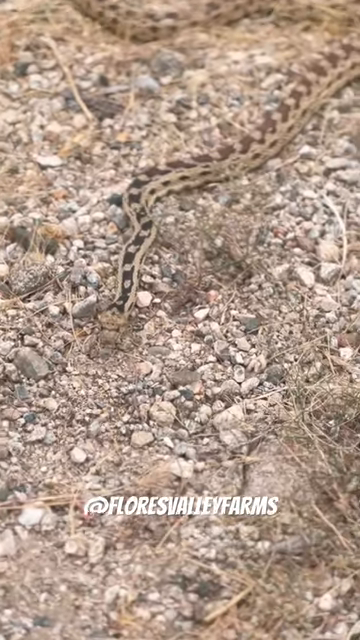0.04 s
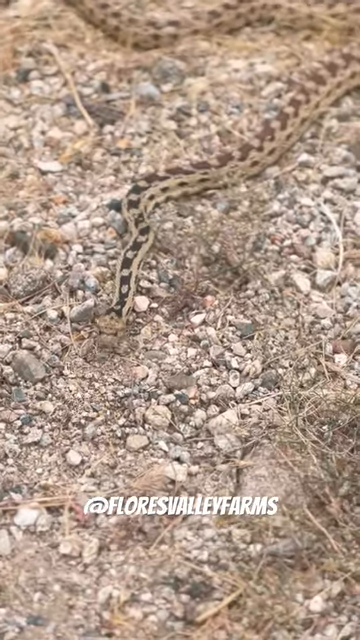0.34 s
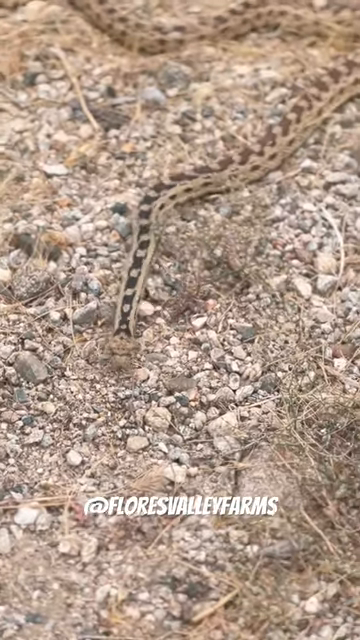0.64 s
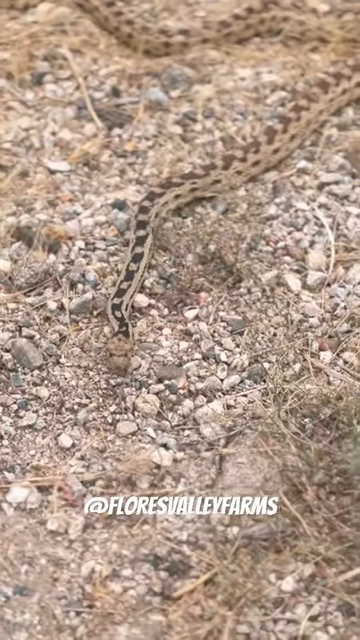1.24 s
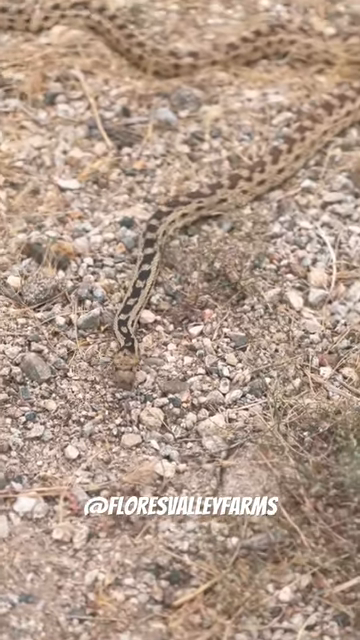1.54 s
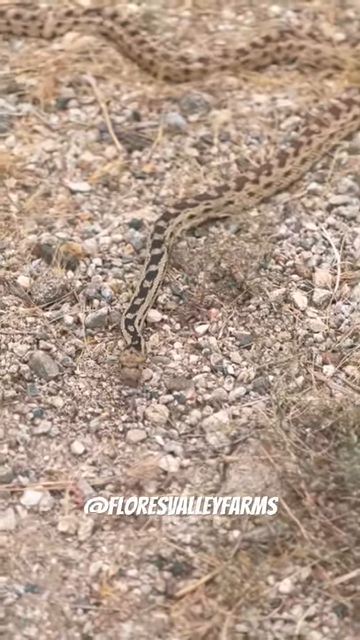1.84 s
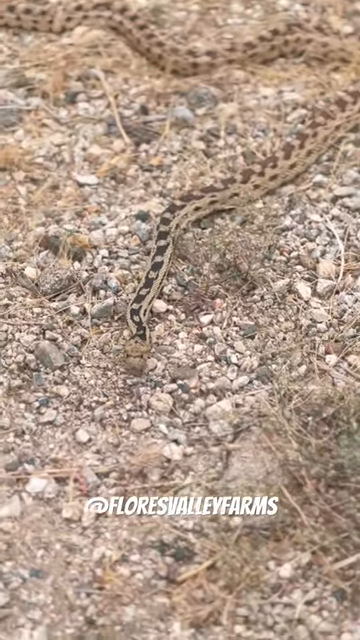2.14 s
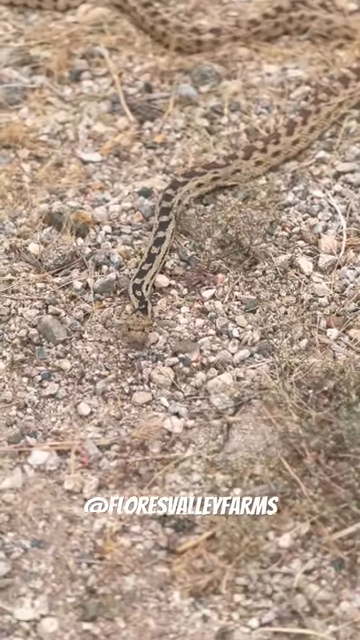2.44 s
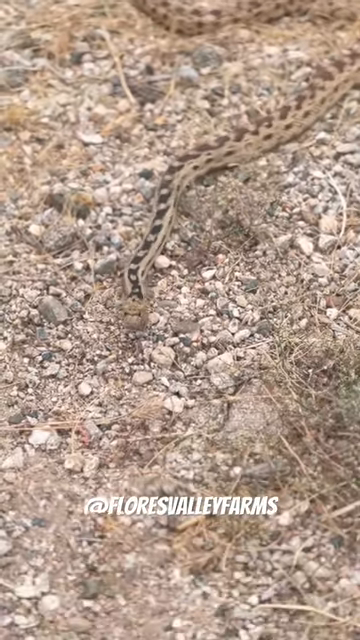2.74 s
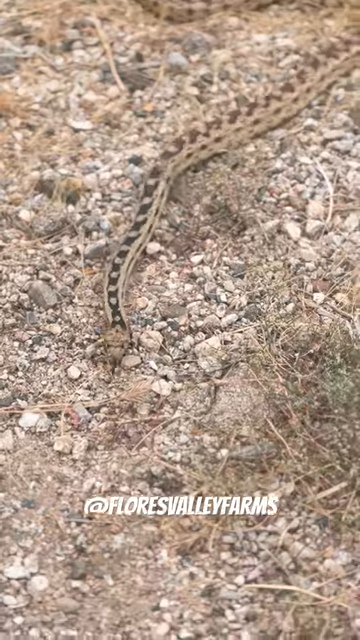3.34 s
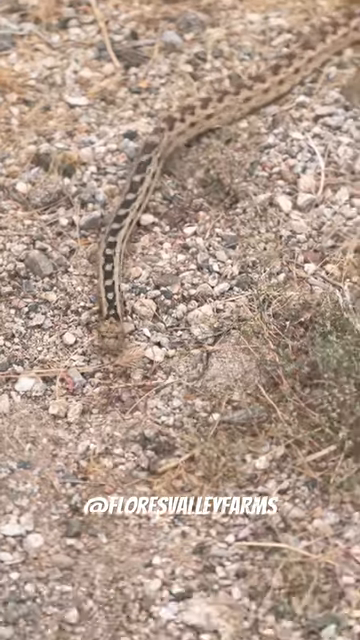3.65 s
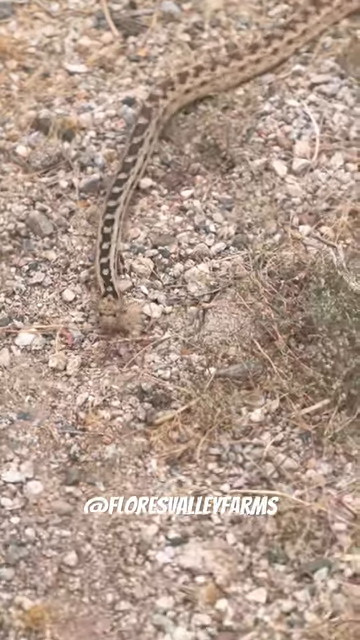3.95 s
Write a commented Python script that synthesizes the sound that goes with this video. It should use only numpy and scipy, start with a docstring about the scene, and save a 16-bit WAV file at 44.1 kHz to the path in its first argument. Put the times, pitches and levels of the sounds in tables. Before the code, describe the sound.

Wind rumbles and flutters on the microphone throughout, thumping and popping harder from about 1.7 seconds. A small animal gives four sharp, high, falling chirps at 0.1, 1.0, 1.8 and 2.7 seconds. A snake slides over gravel with a soft hiss from 1 to 2 seconds and again after 3.2. Dry grass rustles faintly, pebbles tick, and a distant bird is barely heard around 1.2 and 1.6 seconds.

```python
"""Snake on desert gravel

A snake slides over dry gravel, its scales hissing softly and nudging pebbles. A small animal,
probably a ground squirrel, whistles four sharp falling alarm chirps that echo off stones and scrub.
Gusts rumble, flutter, thump and pop on the microphone. Dry grass rustles as its stems brush
together, and something, perhaps a bird, calls faintly far away."""
import sys
import numpy as np
from scipy import signal
from scipy.fft import rfft, irfft
from scipy.io import wavfile
from scipy.ndimage import uniform_filter1d

SR = 44100
rng = np.random.default_rng(int(sys.argv[2]) if len(sys.argv) > 2 else 0)


def put_to_file(sound):
    """Save the sound as 16-bit audio at rate SR, in the file named by the first command-line argument."""
    columns = np.atleast_2d(sound).T  # one column per channel
    safe = np.clip(columns, -1, 1)
    whole_steps = np.round(safe * 32767)
    wavfile.write(sys.argv[1], SR, whole_steps.astype(np.int16))


N = 176400
T = np.arange(N) / SR

# "Mid" is what both ears share and "side" is how they differ: more side sounds wider.
# Width of the wind: f/Hz, side level/dB
WIND_WIDTH = [(60, -29.5), (125, -33), (250, -14), (450, -7.5), (800, -5), (1500, -1), (3000, -24)]
# Width of sounds on the ground: f/Hz, side level/dB
GROUND_WIDTH = [(1000, 6), (5500, -6.5), (9000, -7), (13000, -7)]


def from_db(db):
    """Turn decibels into a factor to multiply by."""
    return 10 ** (np.asarray(db) / 20)


def rms_one(x):
    """Scale a signal so that its average strength (rms) is 1."""
    return x / np.sqrt(np.mean(x ** 2) + 1e-20)


def in_time(rows):
    """Join (time, value) points with straight lines, giving a value for every sample."""
    return np.interp(T, *np.transpose(rows))


def at_hz(rows, hz, column=1):
    """Read a table between its frequencies, with octaves evenly spaced."""
    rows = np.array(rows)
    return np.interp(np.log(np.maximum(hz, 1)), np.log(rows[:, 0]), rows[:, column])


def butter(x, hz, kind, order=2):
    """Keep the lows, the highs or a band; a higher order cuts more sharply."""
    sections = signal.butter(order, np.clip(hz, 10, .48 * SR), kind, fs=SR, output="sos")
    return signal.sosfilt(sections, x + 1e-18)


def drift(rate_hz):
    """A smooth random wobble of typical size 1."""
    pole = np.exp(-40 * np.pi * rate_hz / SR)
    noise = rng.standard_normal(N // 20 + 4002)
    slow = signal.lfilter([1], [1, -2 * pole, pole * pole], noise)[4000:]
    return np.interp(np.arange(N) / 20, np.arange(len(slow)), rms_one(slow))


def stereo(mid, side):
    """Make left and right from mid and side."""
    return np.array([mid + side, mid - side])


def coloured(pair, colour, width):
    """Give two noises a tone colour and a stereo width; the mid has strength 1."""
    hz = np.arange(N // 2 + 1) * SR / N
    spectra = rfft(pair) * from_db(at_hz(colour, hz))
    mid = irfft(spectra[0], N)
    side = irfft(spectra[1] * from_db(at_hz(width, hz)), N)
    return stereo(mid, side) / np.std(mid)


def grains(per_s, spread_db):
    """Tiny random impacts of uneven size, as mid and side."""
    sizes = from_db(spread_db * np.minimum(rng.exponential(1, N), 4))
    hits = rng.random(N) < per_s / SR
    return rms_one(sizes * hits * rng.standard_normal((2, N)))


def evened(pair, span_s):
    """Hold the level of a noise steady over the given span."""
    power = uniform_filter1d(np.mean(pair ** 2, axis=0), max(int(span_s * SR), 2))
    return pair / np.sqrt(power + 1e-9)


def with_energy_of(shape, pair):
    """Scale each of two bursts to hold as much energy as the shape."""
    return pair * np.sqrt(np.sum(shape ** 2) / np.sum(pair ** 2, axis=1, keepdims=True))


def swell(start, length):
    """A smooth rise and fall."""
    return np.sin(np.pi * np.clip((T - start) / length, 0, 1))


def air(level_db=-63):
    """The quiet, steady hush of open air."""
    # Tone of the hush: f/Hz, level/dB
    colour = [(100, -15.5), (220, 13.5), (700, -19.5), (1100, -12.5), (1600, -10.5), (2500, -18.5),
              (4200, -31), (9000, -33.5), (16000, -48.5)]
    # Its width: f/Hz, side level/dB
    width = [(150, 12), (1500, 11), (3000, -1), (6000, -2.5)]
    return from_db(level_db) * coloured(rng.standard_normal((2, N)), colour, width)


def far_bird(blur_hz=190):
    """Faint gliding notes, blurred by distance."""
    # Bird notes: t/s, length/s, first f/Hz, last f/Hz, level/dB
    notes = [(1.138, 0.078, 1800, 1605, -60), (1.201, 0.059, 1584, 1460, -53.5),
             (1.529, 0.138, 1533, 1735, -56)]
    out = np.zeros(N)
    for start, length, first_hz, last_hz, db in notes:
        hz = np.interp(T, [start, start + length], [first_hz, last_hz])
        tone = np.sin(2 * np.pi * np.cumsum(hz) / SR)
        out += from_db(db) * swell(start, length) * drift(blur_hz) * tone
    return out


def grass(flicker_db=2):
    """Dry stems brush together in short crackly swells."""
    # Rustles: t/s, length/s, level/dB
    rustles = [(0.286, 0.24, -63.5), (0.493, 0.24, -68.5), (1.013, 0.13, -59), (1.609, 0.23, -56.5),
               (2.085, 0.28, -59.5), (2.272, 0.18, -56.5), (2.381, 0.35, -65.5), (2.67, 0.26, -66)]
    # Tone of the stems: f/Hz, level/dB
    colour = [(800, 3.5), (1850, 2), (3200, -1), (4400, -9), (5500, -14), (8000, -19), (16000, -35.5)]
    level = sum(from_db(db) * swell(start, length) for start, length, db in rustles)
    flicker = from_db(flicker_db * drift(49))
    return level * flicker * coloured(grains(12000, spread_db=7), colour, GROUND_WIDTH)


def wind_rumble(trim_db=-0.08):
    """Wind on the microphone makes a deep rumble that swells and sinks."""
    # Strength of the rumble: t/s, level/dB
    levels = [(0, -48), (.15, -34.5), (.3, -37.5), (.45, -40), (.6, -38.5), (.8, -39), (.97, -32),
              (1.03, -46), (1.15, -37.5), (1.63, -38.5), (1.73, -22.5), (1.79, -38.5), (1.92, -32.5),
              (2.05, -31), (2.12, -23), (2.22, -26.5), (2.3, -43), (2.36, -31), (2.61, -27), (2.68, -41),
              (2.82, -23.5), (2.93, -30), (2.99, -37), (3.2, -27.5), (3.38, -26), (3.45, -33),
              (3.55, -28.5), (3.82, -30), (3.9, -41.5), (3.95, -24), (4, -46)]
    # Its tone: f/Hz, level/dB
    colour = [(15, -47.5), (30, -17), (45, -5.5), (62, -1.5), (90, -3.5), (130, -8.5), (200, -20),
              (400, -46.5), (1000, -107.5)]
    noise = coloured(rng.standard_normal((2, N)), colour, WIND_WIDTH)
    return from_db(in_time(levels) + trim_db) * evened(noise, span_s=0.067)


def wind_flutter(reference_db=-36.5, eddy_hz=71):
    """Wind noise brightens with each gust and flickers with its eddies (small swirls of air)."""
    # Gust strength: t/s, level/dB
    gusts = [(0, -51), (.07, -43), (.1, -48), (.16, -36), (.24, -41.5), (.33, -54), (.41, -33.5),
             (.47, -50), (.63, -52.5), (.74, -42), (.83, -54), (.87, -47.5), (.97, -40), (1.04, -46),
             (1.15, -46.5), (1.32, -53.5), (1.46, -43), (1.53, -44), (1.65, -39), (1.71, -32.5),
             (1.78, -41), (1.85, -33.5), (2.02, -40), (2.07, -39.5), (2.11, -26.5), (2.16, -34.5),
             (2.25, -30), (2.3, -46.5), (2.33, -28.5), (2.43, -43.5), (2.46, -33), (2.6, -32.5),
             (2.68, -46), (2.73, -35.5), (2.86, -40.5), (2.99, -46.5), (3.07, -34), (3.13, -39.5),
             (3.18, -25), (3.27, -32), (3.33, -36), (3.52, -39), (3.68, -39.5), (3.76, -45), (3.89, -50.5),
             (3.93, -34.5), (4, -48.5)]
    # Flutter bands: f/Hz, level at the reference gust/dB, growth/(dB per dB of gust), flicker/dB
    bands = [(135, -40.5, 0.71, 6), (238, -41, 1, 5), (398, -45.5, 1.24, 6.5), (640, -55.5, 1.38, 12.5),
             (1100, -65.5, 2.4, 5.5), (1570, -80, 2.5, 8), (2800, -92, 0.8, 0)]
    gust_db = in_time(gusts) - reference_db
    eddies = 1.44 * np.tanh(drift(eddy_hz) / 2)
    edges_hz = 125 * 2 ** np.arange(0, 5.1, .5)  # half an octave apart
    out = np.zeros((2, N))
    for low, high in zip(edges_hz, edges_hz[1:]):
        hz = np.sqrt(low * high)
        mid, side = butter(rng.standard_normal((2, N)), [low, high], "band", order=3)
        band = evened(stereo(mid, side * from_db(at_hz(WIND_WIDTH, hz))), span_s=0.038)
        db, growth, flicker_db = (at_hz(bands, hz, column) for column in (1, 2, 3))
        out += band * from_db(db + growth * gust_db + flicker_db * eddies)
    return out


def wind_thumps(width_cycles=0.45):
    """A slow eddy pushes and pulls once or twice on the microphone."""
    # Slow eddies: t/s, level/dB, f/Hz
    thumps = [(0.204, -18, 150), (.43, -21, 67.7), (0.731, -20, 82.5), (0.982, -27.5, 129),
              (1.341, -26.5, 92), (1.477, -24.5, 74), (1.905, -18, 75), (2.12, -13.5, 128),
              (3.223, -27, 190), (3.578, -18, 68), (3.714, -17, 67)]
    out = np.zeros(N)
    for centre, db, hz in thumps:
        cycles = (centre - T) * hz
        out += from_db(db) * np.sin(2 * np.pi * cycles) * np.exp(-(cycles / width_cycles) ** 2 / 2)
    return out


def wind_slaps(attack_s=0.001362, trim_db=-0.5, edge_db=-37.5, side_db=-8):
    """An eddy slaps the microphone with a sudden puff; the faster it is, the brighter it sounds."""
    # Puffs: t/s, level/dB, fade time/s, treble cutoff/Hz
    puffs = [(0.199, -30, 0.019, 550), (0.418, -28.5, 0.0057, 820), (.86, -40, 0.0073, 480),
             (1, -43.5, 0.0064, 1550), (1.101, -38.5, 0.011, 720), (1.186, -38.5, 0.0027, 785),
             (1.453, -32, 0.0095, 656), (1.59, -32.5, 0.0042, 876), (1.681, -31, 0.0075, 870),
             (1.733, -36, 0.0044, 820), (1.834, -24.5, 0.0088, 570), (1.884, -29.5, 0.0075, 750),
             (1.941, -21, 0.011, 467), (2.082, -26.5, 0.01, 790), (2.103, -23, 0.0091, 690),
             (2.12, -23.5, 0.019, 564), (2.172, -34, 0.0059, 596), (2.208, -23.5, 0.0062, 700),
             (2.252, -28.5, 0.0066, 1100), (2.326, -18.5, 0.0048, 420), (2.446, -31, 0.0046, 870),
             (2.467, -36, 0.0077, 990), (2.483, -27.5, 0.0073, 1130), (2.615, -30, 0.0098, 1010),
             (2.726, -28, 0.012, 583), (2.772, -34.5, 0.0087, 845), (3.156, -20.5, 0.0048, 650),
             (3.184, -17.5, 0.018, 378), (3.248, -26, 0.0077, 597), (3.262, -28, 0.0034, 640),
             (3.275, -16, 0.0093, 380), (3.339, -26, 0.0072, 567), (3.442, -28, 0.0081, 760),
             (3.803, -28, 0.0043, 603), (3.921, -32, 0.015, 640)]
    out, t = np.zeros((2, N)), T[:SR // 8]
    for peak_s, db, decay_s, cutoff_hz in puffs:
        shape = np.minimum(t / attack_s, 1) * np.exp(-np.maximum(t - attack_s, 0) / decay_s)
        noise = evened(rng.standard_normal((2, len(t))), span_s=0.00043) * shape
        body = butter(noise, cutoff_hz, "low", order=4)
        edge = from_db(edge_db) * butter(noise, 2 * cutoff_hz, "low", order=4)
        mid, side = with_energy_of(shape, butter(body + edge, 150, "high"))
        i = int((peak_s - attack_s) * SR)
        out[:, i:i + len(t)] += from_db(db + trim_db) * stereo(mid, side * from_db(side_db))[:, :N - i]
    return out


def wind_pops(trim_db=-1, wake_db=-3, wake_s=0.0045, side_db=-8, low_hz=232, high_hz=3270):
    """A tight swirl crosses the microphone: a pressure spike, then a ragged wake. Narrow is bright."""
    # Pops: t/s, level/dB, width/s
    pops = [(.4258, -20, 0.00026), (0.5406, -22, 0.00087), (.656, -27, 0.00047), (0.98, -16.5, .0011),
            (1.4701, -13.5, .0008), (1.6893, -17, 0.00073), (1.6919, -14.5, 0.00044),
            (1.8946, -18, 0.00081), (1.991, -28, 0.0006), (2.045, -17.5, .0008), (2.1066, -31, 0.00039),
            (2.1207, -15.5, 0.00057), (2.187, -10.5, 0.00074), (2.2074, -16, 0.0006),
            (2.2263, -13, 0.00073), (2.245, -9.5, 0.00048), (2.328, -31, 0.00014), (2.3611, -20.5, 0.00049),
            (2.376, -15, 0.00059), (2.3794, -13, 0.00054), (2.401, -23.5, 0.00059), (2.5031, -19, 0.00056),
            (2.5504, -32, 0.00035), (2.6041, -12, 0.00046), (2.7783, -19.5, 0.00055),
            (2.8613, -10, 0.00048), (2.8698, -16, 0.00043), (3.1603, -24, 0.00056), (3.1786, -22, .0008),
            (3.1996, -10.5, 0.00072), (3.2072, -11.5, 0.00057), (3.219, -15, 0.00084),
            (3.2988, -18.5, 0.00066), (3.4049, -18, 0.00054), (3.4893, -14.5, 0.00097),
            (3.71, -21, 0.00084)]
    out, size = np.zeros((2, N)), SR // 20
    t = (np.arange(size) - size // 10) / SR
    hz = np.arange(size // 2 + 1) * SR / size
    soft_ends = signal.get_window(("tukey", .15), size)
    mid_and_side = np.array([[1], [1j * from_db(side_db)]])  # a quarter cycle apart
    for peak_s, db, width_s in pops:
        wake = rng.standard_normal((2, size)) * (t > 0) * np.exp(-np.abs(t) / wake_s)
        wake *= from_db(wake_db) / np.sqrt(np.sum(wake[0] ** 2))
        random_phase = np.exp(2j * np.pi * rng.random())
        spike = rfft(1. * (t == 0)) * mid_and_side * random_phase
        blur = np.exp(-np.pi * width_s * hz)
        pulse = irfft((spike + rfft(wake)) * blur, size) / irfft(blur, size)[0] * soft_ends
        mid, side = butter(butter(pulse, low_hz, "high"), high_hz, "low", order=3)
        i = int((peak_s + t[0]) * SR)
        out[:, i:i + size] += from_db(db + trim_db) * stereo(mid, side)[:, :N - i]
    return out


def pebbles(sharpness=0.77):
    """A pebble or twig gives way with a tiny crunch in one broad band of pitch."""
    # Crunches: t/s, level/dB, f/Hz, fade time/s
    ticks = [(0.323, -56, 4260, 0.0071), (0.7338, -56, 11000, 0.0051), (0.998, -51, 3700, 0.0021),
             (1.0924, -51, 12000, .005), (1.314, -60, 10000, .003), (1.66, -41, 2820, 0.0013),
             (1.8939, -41.5, 9150, 0.0014), (1.909, -44, 11000, 0.0025), (1.914, -50, 5700, 0.0035),
             (2.349, -47, 2800, 0.0015), (3.5354, -47, 10400, 0.0084), (3.979, -35, 3000, 0.0022)]
    out, t = np.zeros((2, N)), T[:SR // 10]
    edge_ratio = 1 + .5 / sharpness
    for start, db, hz, decay_s in ticks:
        shape = np.exp(-t / decay_s)
        burst = rng.standard_normal((2, len(t))) * shape
        crunch = butter(burst, [hz / edge_ratio, hz * edge_ratio], "band", order=3)
        mid, side = with_energy_of(shape, crunch)
        side *= from_db(at_hz(GROUND_WIDTH, hz))
        i = int(start * SR)
        out[:, i:i + len(t)] += from_db(db) * stereo(mid, side)[:, :N - i]
    return out


def echo_spray(db, fade_s, first_s=0.0042):
    """A dense spray of tiny echoes that falls by 60 dB in fade_s."""
    t = T[:SR // 2]
    spray = grains(4000, spread_db=3)[:, :len(t)] * from_db(-60 * t / fade_s) * (t > first_s)
    return from_db(db) * spray / np.sqrt(np.sum(spray[0] ** 2))


def scrub_echoes(call, treble_db=8.5, side_db=-7):
    """Stones close by add quick, bright echoes to a call; bushes farther off add a faint, dull tail."""
    stones = echo_spray(db=-7, fade_s=0.11)
    stones += from_db(treble_db) * butter(stones, 8700, "high", order=8)
    bushes = butter(echo_spray(db=-10, fade_s=0.39), 5170, "low", order=5)
    mid, side = (signal.fftconvolve(call, echoes)[:N] for echoes in stones + bushes)
    return stereo(call + mid, from_db(side_db) * side)


def alarm_chirps():
    """Each chirp is a whistle that plunges and levels off, its overtones gaining on it as it fades."""
    # Chirps: t/s, level/dB, final f/Hz, length/s, overtone level against the whistle/dB
    chirps = [(0.1206, -29, 5096, 0.037, -26.5), (1.0254, -31, 5120, 0.044, -23),
              (1.767, -33, 5120, 0.053, -25.5), (2.6999, -33.5, 5030, 0.046, -26.5)]
    swoop_hz, swoop_s = 2130, .0125  # the pitch sinks towards its final value
    snap_hz, snap_s = 1310, 0.0043  # with a steeper drop at the very start
    attack_s, hold_s, release_s = 0.011, 0.0045, 0.0055
    fade_db_per_s, overtone_db_per_s, third_db = 375, 222, -9
    out = np.zeros(N)
    for start, db, end_hz, length, overtone_db in chirps:
        t = np.clip(T - start, 0, 2 * length)
        hz = end_hz + swoop_hz * np.exp(-t / swoop_s) + snap_hz * np.exp(-t / snap_s)
        phase = 2 * np.pi * np.cumsum(hz * (1 + 0.0026 * drift(210))) / SR
        opening = np.sin(np.pi / 2 * np.minimum(t / attack_s, 1)) ** 2
        closing = np.clip((length - t) / release_s + .5, 0, 1)
        level = from_db(db - fade_db_per_s * np.maximum(t - hold_s, 0))
        overtones = np.sin(2 * phase) + from_db(third_db) * np.sin(3 * phase)
        overtones *= from_db(overtone_db + overtone_db_per_s * (t - hold_s))
        out += opening * closing * level * (np.sin(phase) + overtones)
    return out


def snake(trim_db=-5.5, grain_db=0.5, flicker_db=1.68, patchy_db=1.74, band_hz=1200):
    """Belly scales drag over sand: countless grains slip in a hiss whose tone shifts with the ground."""
    # Strength of the sliding: t/s, level/dB
    levels = [(0, -80), (.72, -82), (.75, -69), (.82, -66), (1.0, -63), (1.1, -57.5), (1.22, -51),
              (1.38, -61.5), (1.55, -54.5), (1.67, -50.5), (1.85, -55.5), (2.1, -55), (2.24, -85.5),
              (2.41, -60.5), (2.58, -77), (3.14, -79), (3.21, -61), (3.33, -52.5), (3.55, -47), (3.82, -54),
              (4, -47.5)]
    # Tone of the hiss: f/Hz, level/dB
    colour = [(1000, -6), (2000, -6), (3500, -5), (5000, -5.5), (6400, -4.5), (7300, -5.5), (8400, 2),
              (9600, 0), (11500, -9.5), (14500, -5.5), (16000, -3)]
    friction = rng.standard_normal((2, N)) + from_db(grain_db) * grains(2300, spread_db=-2)
    spectrum = rfft(coloured(friction, colour, GROUND_WIDTH))
    band = np.arange(spectrum.shape[1]) * SR // N // band_hz  # each band wavers on its own
    hiss = sum(irfft(spectrum * (band == k), N) * from_db(patchy_db * drift(8)) for k in range(14))
    return from_db(in_time(levels) + trim_db + flicker_db * drift(35)) * hiss


def scene():
    """Animals, ground and wind over quiet open air."""
    hush = air()
    calls = scrub_echoes(alarm_chirps()) + far_bird()
    ground = snake() + grass() + pebbles()
    wind = wind_rumble() + wind_flutter() + wind_thumps() + wind_slaps() + wind_pops()
    return hush + calls + ground + wind


def record(dry, low_cut_hz=37, high_cut_hz=15950, spread_db=-1.5, spread_above_hz=4000):
    """The recorder narrows the bass and upper mids, widens the treble, and cuts the extremes of pitch."""
    # The recorder's stereo width: f/Hz, side level/dB
    width = [(1500, -7.5), (1900, -24.5), (2600, -34), (4600, -40.5), (5100, -4.5), (16000, 2)]
    # The bass goes mono (alike in both ears) as the wind picks up: t/s, mono below f/Hz
    mono_below = [(0, 167), (1.25, 169), (1.45, 364), (2.8, 432), (3.1, 560), (4, 585)]
    hz, times, (mid, side) = signal.stft(stereo(*dry) / 2, SR, nperseg=1024)
    hz = hz[:, None]
    # In the treble, part of the mid enters the side a quarter cycle late.
    side = side - 1j * from_db(spread_db) * mid * (hz > spread_above_hz)
    mono_hz = np.interp(times, *np.transpose(mono_below))
    bass_cut = 1 / np.sqrt(1 + (mono_hz / np.maximum(hz, 1)) ** 12)
    side = signal.istft(side * bass_cut * from_db(at_hz(width, hz)), SR)[1][:N]
    out = butter(stereo(dry.mean(axis=0), side), low_cut_hz, "high", order=4)
    return signal.sosfilt(signal.ellip(10, .2, 80, high_cut_hz, fs=SR, output="sos"), out)


dry = scene()
out = record(dry)
put_to_file(out)
```